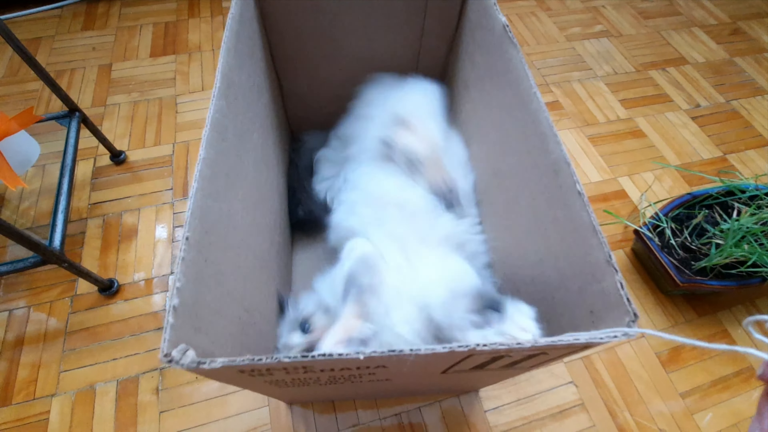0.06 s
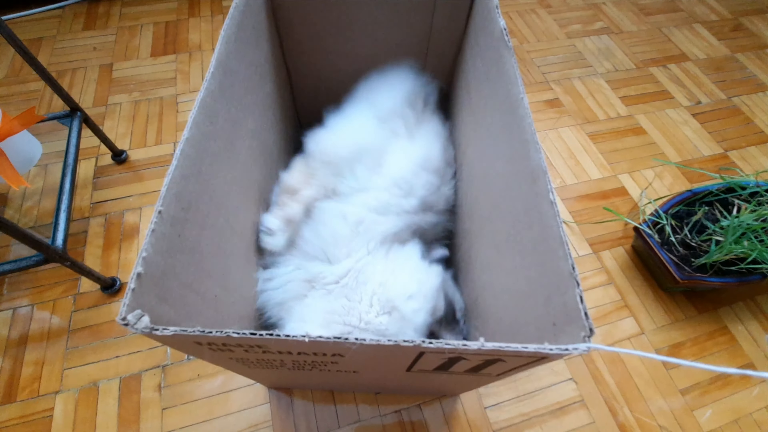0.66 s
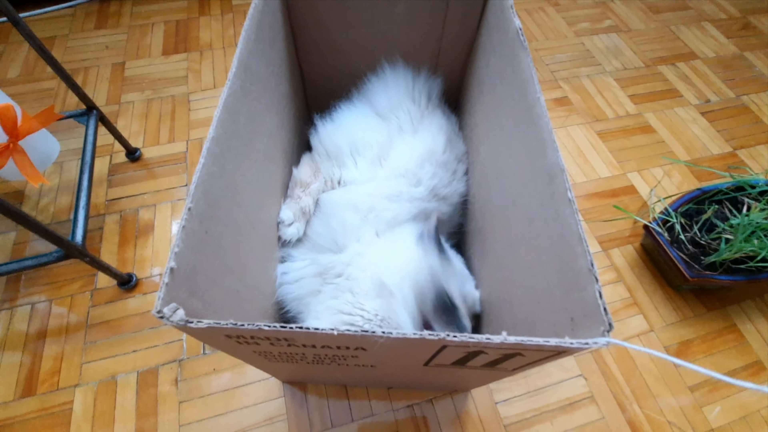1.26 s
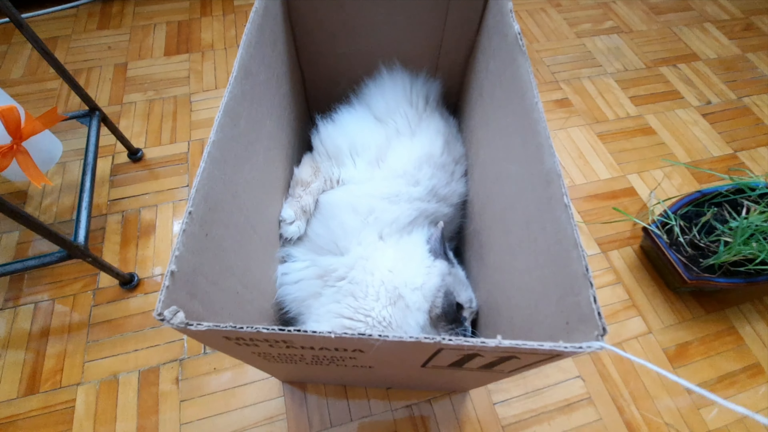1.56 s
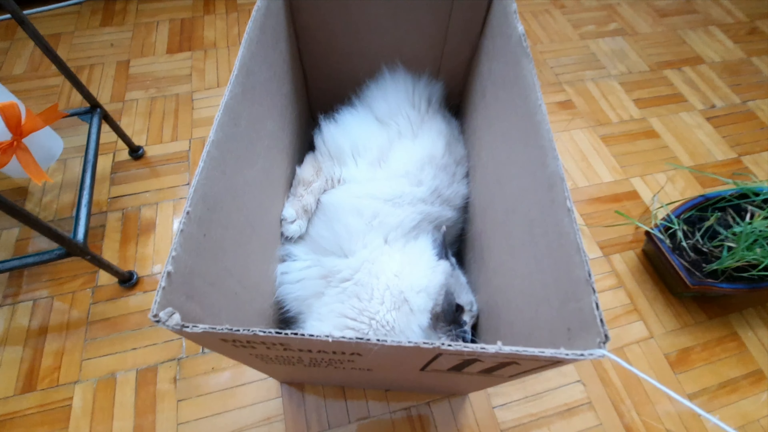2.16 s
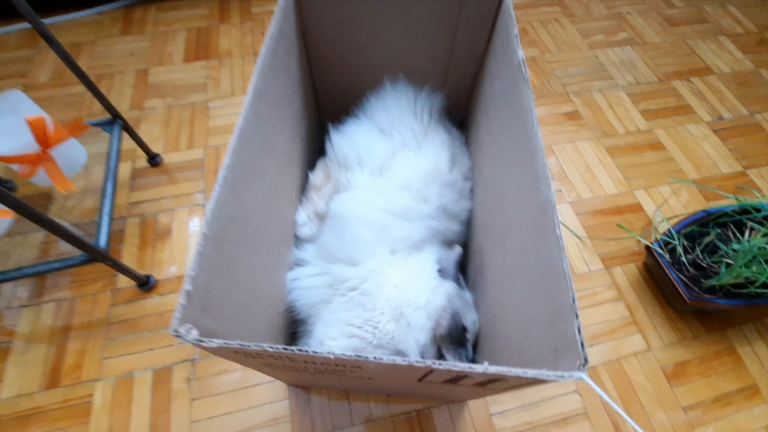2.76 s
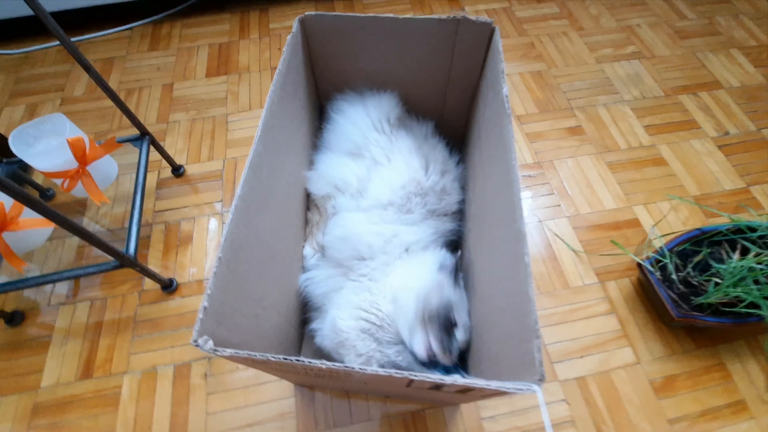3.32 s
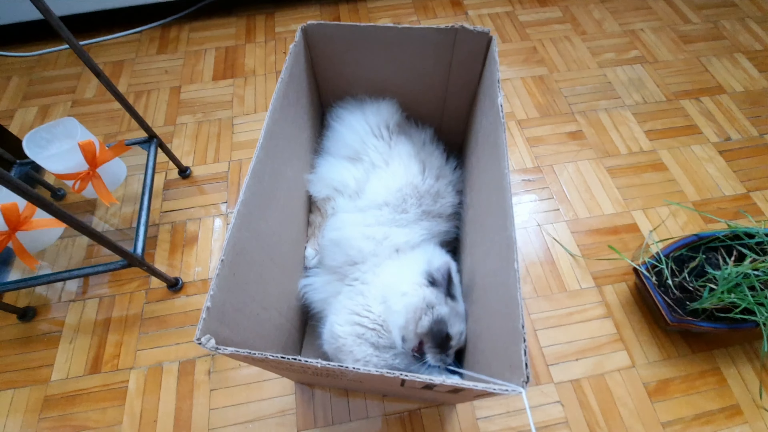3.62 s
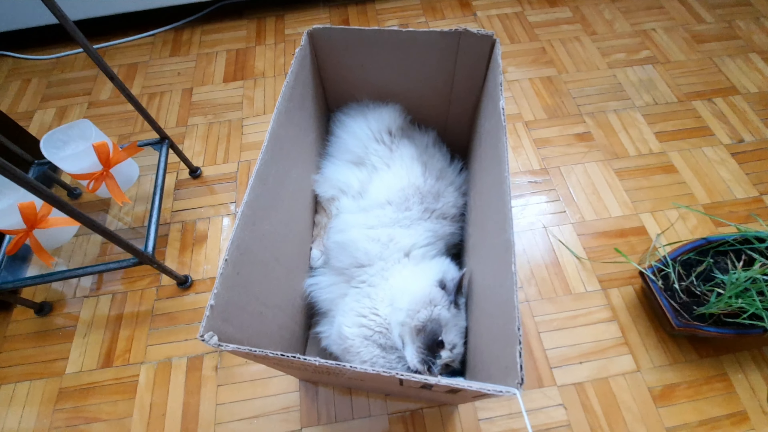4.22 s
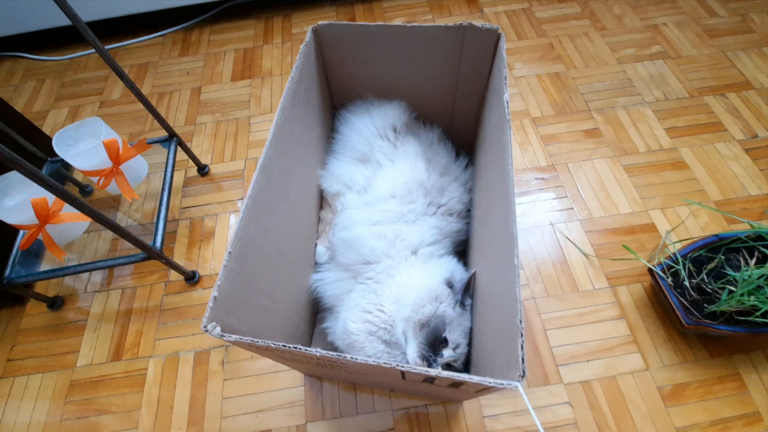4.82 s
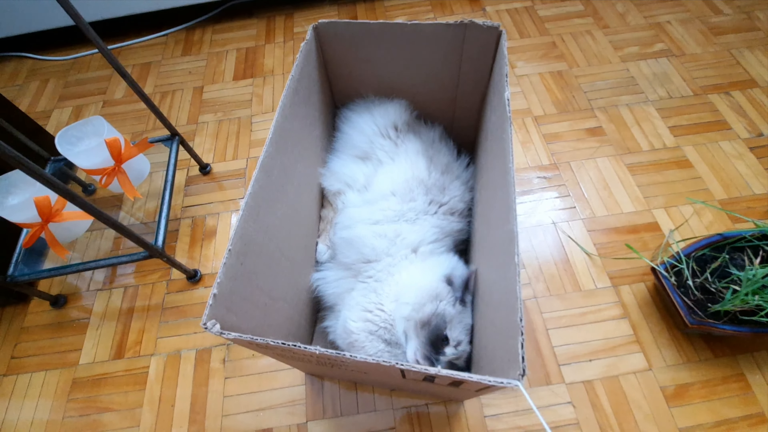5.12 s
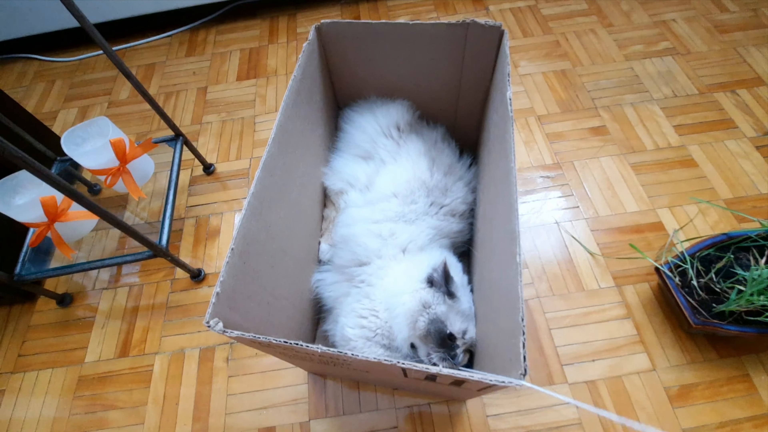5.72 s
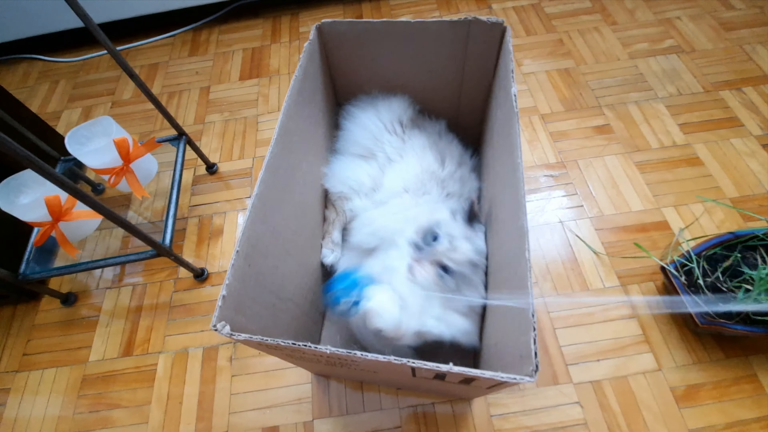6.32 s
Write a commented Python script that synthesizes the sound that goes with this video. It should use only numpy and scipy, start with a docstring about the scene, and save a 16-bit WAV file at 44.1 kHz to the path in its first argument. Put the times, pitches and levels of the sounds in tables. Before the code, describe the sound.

Close by in a quiet, faintly humming room, a cat tumbles in a cardboard box, bumping and scratching the panels and jostling a small bell toy. A lull follows with one brief tap and rattle. Midway, soft string rubbing builds into a scraping swipe with several knocks and thin jingles. Faint taps and rustles continue until a final burst of hollow knocks and rattling.

```python
"""A cardboard box on a wooden floor in a quiet, humming room. A cat rolls over in the box, then lies
still and swats at a toy on a string. Paws and flanks thump the panels, claws snap free, fur and string
stick and slip on the card; all of these set the box ringing. When the toy is jostled, a pellet rattles
in its tiny bell. Table levels are relative, ahead of each layer's gain."""
import sys
import numpy as np
from scipy import signal
from scipy.fft import rfft, irfft, next_fast_len
from scipy.io import wavfile
from scipy.ndimage import uniform_filter1d

SR = 44100
rng = np.random.default_rng(int(sys.argv[2]) if len(sys.argv) > 2 else 0)


def generate_wav(sig):
    """Save sig (samples, or channels by samples) to the path in sys.argv[1] as 16-bit PCM at SR."""
    pcm = np.round(np.clip(np.atleast_2d(sig).T, -1, 1) * 32767).astype(np.int16)
    wavfile.write(sys.argv[1], SR, pcm)


N = 281338
FFT_SIZE = next_fast_len(N + SR)
FREQ_HZ = np.arange(FFT_SIZE // 2 + 1) * SR / FFT_SIZE + 1e-3
TIME_S, EVENT_S = np.arange(N) / SR, np.arange(SR // 4) / SR


def amp(db):
    return 10 ** (np.asarray(db) / 20)


def unit_rms(x):
    return x / np.sqrt(np.mean(x ** 2) + 1e-20)


def curve(points, hz=FREQ_HZ):
    """Table interpolated over log frequency."""
    f, value = np.transpose(points)
    return np.interp(np.log(hz + 1), np.log(f), value)


def add(mix, s, sound):
    part = mix[max(round(s * SR), 0):][:len(sound)]
    part += sound[:len(part)]


def filtered(x, gain):
    return irfft(rfft(x, FFT_SIZE) * gain, FFT_SIZE)[..., :N]


def resonance(hz, width_hz):
    """One damped mode, peak gain 1."""
    return 1 / (1 + 1j * (FREQ_HZ ** 2 - hz ** 2) / (FREQ_HZ * width_hz))


def band_gain(spectrum, lo_hz, hi_hz):
    """Spectrum as a gain that gives white noise rms 1 within the band."""
    gain = amp(curve(spectrum))
    return gain / np.sqrt(np.mean(gain ** 2 * (FREQ_HZ > lo_hz) * (FREQ_HZ < hi_hz)))


def stereo_noise(envelope, gain, coherence_scale=1):
    """Enveloped, filtered noise; the channels agree only at low frequencies."""
    # left-right coherence: f/Hz, coherence
    coherence = [(60, 1), (300, 1), (700, 0.61), (1400, 0.089), (3000, 0.11), (15000, 0)]
    left, other = filtered(envelope * rng.standard_normal((2, N)), gain)
    shared = curve(coherence) * coherence_scale
    right = filtered(left, shared) + filtered(other, np.sqrt(1 - shared ** 2))
    return np.array([left, right])


def room_tone():
    """Diffuse murmur, faint humming resonances and a rumble that comes and goes."""
    # murmur and rumble spectra: f/Hz, density/dB
    murmur_spectrum = [(15, -60), (25, -33), (41, -12.5), (64, -10.5), (175, -7.5), (242, -12.5), (317, -6),
                       (463, -14.5), (659, -15.5), (714, -19.5), (1020, -22), (1840, -25), (5880, -44.5),
                       (7920, -42.5), (16000, -52)]
    rumble_spectrum = [(25, -31), (45, -18), (60, 4), (85, -6.5), (120, -46), (250, -21), (1000, -84)]
    # background levels: t/s, murmur/dB, rumble/dB
    levels = [(0, -54.5, -55), (1.3, -61, -69), (2.1, -62.5, -73), (3.3, -62.5, -62), (4.25, -58.5, -55),
              (4.7, -61, -61.5), (5.7, -55.5, -59.5), (6.38, -55, -64)]
    # room resonances: f/Hz, width per stage/Hz, initial level/dB, drift/(dB/s)
    hums = [(147, 8.3, -76, 0.13), (331.2, 41, -69, 0.63), (2840, 500, -76.5, -0.1),
            (8090, 180, -87.5, 0.05)]
    s, murmur_db, rumble_db = np.transpose(levels)
    murmur = unit_rms(stereo_noise(1, amp(curve(murmur_spectrum)), coherence_scale=0.71))
    rumble = unit_rms(stereo_noise(1, amp(curve(rumble_spectrum))))
    tone = murmur * amp(np.interp(TIME_S, s, murmur_db)) + rumble * amp(np.interp(TIME_S, s, rumble_db))
    for hz, width_hz, db, db_per_s in hums:
        hum = unit_rms(stereo_noise(1, resonance(hz, width_hz) ** 2, coherence_scale=0.72))
        tone += amp(db + db_per_s * TIME_S) * hum
    return tone


def stroke_forces(strokes):
    """Hiss and scrape envelopes; each stroke gathers speed and dies away."""
    roundness = 1.215  # 1 pointed, 2 bell-shaped
    power = np.zeros((2, N))
    for s, rise_s, fall_s, hiss_db, scrape_db in strokes:
        span_s = np.where(TIME_S < s, rise_s, fall_s)
        speed = np.exp(-np.abs((TIME_S - s) / span_s) ** roundness)
        power += np.outer(amp([hiss_db, scrape_db]), speed) ** 2
    return np.sqrt(power)


def stick_slip(rate_hz, spread_db, grain_s, drag):
    """Brief, uneven slips over a steady drag."""
    sizes = amp(spread_db * np.minimum(rng.exponential(1, N), 4))
    slips = sizes * (rng.random(N) < rate_hz / SR)
    power = signal.lfilter([1], [1, -np.exp(-2 / (grain_s * SR))], slips ** 2)
    return unit_rms(np.sqrt(power / power.mean() + drag))


def rub(forces, hiss_spectrum):
    """Fibres hiss over card; under pressure they catch and scrape."""
    # scraped card: f/Hz, density/dB
    scrape_spectrum = [(40, -1), (130, 6), (240, -6), (380, 4), (700, 0.5), (1300, 5), (2200, 3),
                       (3300, -1.5), (6000, -11.5), (15000, -10)]
    hiss_force = forces[0] * stick_slip(rate_hz=900, spread_db=2.5, grain_s=0.0014, drag=2.0)
    scrape_force = forces[1] * stick_slip(rate_hz=700, spread_db=2.5, grain_s=0.0025, drag=0.76)
    hiss = stereo_noise(hiss_force, band_gain(hiss_spectrum, 6000, 12000))
    scrape = stereo_noise(scrape_force, band_gain(scrape_spectrum, 1300, 2600))
    return amp(2) * hiss + amp(0.5) * scrape


def fur():
    """The body rolls and settles while paws drag over the card."""
    # rolling body: t/s, hiss/dB, scrape/dB
    roll = [(0, -69.5, -96), (0.099, -53.5, -52), (.26, -52, -57), (.43, -46.5, -45.5), (.55, -50, -53.5),
            (.68, -54, -55.5), (.79, -62.5, -65), (1.04, -71.5, -65), (1.33, -79.5, -93), (2.1, -86, -80),
            (2.4, -100, -99)]
    # paw drags: peak t/s, rise/s, fall/s, hiss/dB, scrape/dB
    paw_strokes = [(.102, 0.018, 0.02, -68, -48), (.336, 0.036, 0.037, -43, -35),
                   (.373, .003, .004, -34, -55), (.408, 0.0023, 0.011, -40.5, -31),
                   (.880, 0.011, .018, -57, -49), (.903, .018, 0.018, -68, -52),
                   (.962, 0.0057, 0.022, -70, -53), (1.155, 0.019, 0.042, -69, -65),
                   (1.48, 0.039, 0.021, -65, -92), (1.53, 0.041, 0.064, -67, -60.5)]
    # fur on card: f/Hz, density/dB
    hiss_spectrum = [(150, -30), (600, 9), (1500, -17.5), (3300, 3.5), (5500, 2.5), (8000, 3), (12000, 4.5),
                     (15500, -4.5)]
    s, *levels_db = np.transpose(roll)
    body = amp([np.interp(TIME_S, s, db, right=-120) for db in levels_db])
    return rub(np.hypot(body, stroke_forces(paw_strokes)), hiss_spectrum)


def card_flex(db, hz, swell_s):
    """Struck card swings briefly; the envelope peaks at swell_s."""
    envelope = EVENT_S / swell_s * np.exp(1 - EVENT_S / swell_s)
    return amp(db - 2.5) * envelope * np.sin(2 * np.pi * hz * EVENT_S)


def card_crack(hits):
    """Bright noise burst for each quick blow, given as (t/s, amplitude)."""
    # cracking card: f/Hz, density/dB
    spectrum = [(300, -43), (1200, -0.5), (2500, 3.5), (5000, -10), (10000, -10), (16000, -12)]
    decay = np.exp(-EVENT_S / 0.0098) + 0.54 * np.exp(-EVENT_S / 0.032)
    force = np.zeros(N)
    for s, gain in hits:
        add(force, s, gain * decay)
    return amp(-1.5) * stereo_noise(force, unit_rms(amp(curve(spectrum))))


def knocks():
    """Paws and head flex, slap and crunch a panel; only quick blows crack brightly."""
    # blows: t/s, knock/dB, panel f/Hz, swell/s, slap/dB, crunch/dB
    blows = [(.096, -21.5, 337, 0.0043, -34, -33.5), (.141, -25, 366, 0.0016, -41, -36),
             (.238, -12.5, 760, .00048, -33, -25), (.410, -14.5, 338, 0.004, -28, -28),
             (0.422, -25.5, 525, 0.0046, -55, -42), (.501, -16.5, 355, 0.0009, -40, -32.5),
             (.537, -34, 496, 0.0026, -44, -24), (0.555, -28.5, 325, 0.0057, -60, -42),
             (.667, -22, 317.6, 0.0063, -43, -43), (.754, -39, 306, 0.0071, -62, -52),
             (.852, -44.5, 503, 0.0038, -68, -37), (.971, -41, 332, 0.0027, -62, -51),
             (.983, -39, 358, 0.0023, -65, -50), (1.4819, -33.5, 340, 0.0042, -27.5, -33),
             (1.503, -34, 323, 0.0044, -64, -45), (3.554, -34, 372, 0.0052, -67, -50),
             (3.568, -29, 404, 0.007, -50, -26.5), (3.572, -30, 503, 0.0029, -54, -56),
             (3.679, -27, 379, .0024, -51, -33), (3.706, -31.5, 390, 0.0037, -57, -39.5),
             (4.411, -36.5, 349, 0.0038, -53.5, -48.5), (4.429, -45, 385, .006, -62, -50.5),
             (5.476, -44, 416, 0.0039, -70, -49), (6.104, -46, 367, 0.0077, -67, -47.5),
             (6.271, -40, 430, .0023, -56, -50), (6.344, -18.5, 350, 0.0014, -25, -48),
             (6.349, -24.5, 620, .0047, -60, -48), (6.361, -20.5, 320, 0.004, -54, -38)]
    # card ringing around the paw: delay/s, f/Hz, swell/s, level/dB
    slap_modes = [(0, 890, 0.0015, -2.5), (.001, 1036, 0.0026, -14.5), (.005, 594, 0.004, -12)]
    # dull papery crunch: f/Hz, density/dB
    crunch_spectrum = [(60, -6.5), (230, -1), (600, 5.5), (1100, -7.5), (2000, -24), (4000, -29),
                       (10000, -26), (16000, -57)]
    give_lag_s = 0.00097  # the panel yields just after contact
    crumple = np.exp(-EVENT_S / 0.0055) + 0.23 * np.exp(-EVENT_S / 0.049)
    flex, crunch_force = np.zeros((2, N))
    cracks = []
    for s, knock_db, hz, swell_s, slap_db, crunch_db in blows:
        add(flex, s + give_lag_s, card_flex(knock_db, hz, swell_s))
        for delay_s, ring_hz, ring_swell_s, ring_db in slap_modes:
            add(flex, s + delay_s, card_flex(slap_db + ring_db, ring_hz, ring_swell_s))
        add(crunch_force, s, amp(crunch_db) * crumple)
        hardness = 1 / (1 + (swell_s / 0.00043) ** 2)
        cracks.append((s, amp(crunch_db) * hardness))
    crunch = stereo_noise(crunch_force, unit_rms(amp(curve(crunch_spectrum))))
    return flex + amp(-3) * crunch + card_crack(cracks)


def thuds():
    """The cat's weight bends a wall; the box bottom follows with a boom."""
    # landings: t/s, wall/dB, wall f/Hz, swell/s, bottom/dB
    landings = [(.106, -26.5, 127.4, .010, -30), (.149, -24, 129, 0.0074, -26),
                (.248, -44, 131, 0.012, -35.5), (0.432, -34, 89, 0.0078, -33),
                (0.508, -11.5, 163, .0024, -21.5), (.573, -28.5, 154, 0.0083, -49),
                (0.675, -23.5, 110, 0.0043, -30), (1.524, -40, 142, 0.0039, -51),
                (1.558, -42, 100, 0.003, -66), (3.576, -36.5, 132, 0.017, -58),
                (4.42, -50.5, 128, 0.013, -63), (5.253, -48, 84.5, 0.0092, -74),
                (6.356, -31, 103, .0078, -55)]
    bottom_lag_s = 0.014
    flex = np.zeros(N)
    for s, wall_db, hz, swell_s, bottom_db in landings:
        add(flex, s, card_flex(wall_db, hz, swell_s))
        add(flex, s + bottom_lag_s, card_flex(bottom_db, hz=59.5, swell_s=0.011))
    return flex


def claws():
    """A claw catches in the card and snaps free."""
    # snaps: t/s, level/dB, f/Hz
    snaps = [(0.373, -20, 4700), (0.4058, -21, 5600), (0.668, -37, 5500), (0.959, -33.5, 3370)]
    flex = np.zeros(N)
    for s, db, hz in snaps:
        add(flex, s, card_flex(db, hz, swell_s=0.00018))
    return flex + card_crack([(s, amp(db - 17.5)) for s, db, _ in snaps])


def shell_ring(hz, t60_s, smear_hz):
    """Decaying bell modes; the rolling pellet disturbs the phase and widens each line."""
    steps = rng.standard_normal((len(hz), len(EVENT_S)))
    drift_rad = np.cumsum(steps, 1) * np.sqrt(2 * np.pi * smear_hz / SR)
    phase_rad = 2 * np.pi * (hz * EVENT_S + rng.random(hz.shape)) + drift_rad
    return amp(-60 * EVENT_S / t60_s) * np.sin(phase_rad)


def toy_bell(ping_hz):
    """The pellet strikes and chatters in the shell; a thin ping rings on."""
    # jostles: t/s, rattle/dB, tilt/(dB/octave), most excited f/Hz, ping/dB
    jostles = [(.442, -29, -11, 4300, -46), (0.525, -23.5, -8, 4900, -53), (0.55, -26.5, -18, 5250, -53),
               (.614, -34, 6, 5300, -57), (0.878, -41, -6, 5300, -55), (1.009, -44.5, 2, 7000, -53),
               (1.026, -37, 1, 5300, -49.5), (1.091, -47, -8, 5300, -68), (1.116, -52, -3, 5300, -52),
               (1.482, -38, 9, 5300, -63), (1.5156, -39, -4, 5300, -66), (2.559, -45, 1, 4450, -58),
               (3.5895, -32, -7, 4300, -44), (3.65, -40, -8, 4300, -48), (3.6855, -29, 9, 4300, -44),
               (3.715, -32.5, -3, 4500, -49), (3.743, -39, 1, 4700, -55), (3.762, -37.5, -1, 4300, -53),
               (3.832, -47.5, -4, 4410, -69), (5.355, -52.5, -3, 4300, -85), (5.379, -50, -5, 4300, -76),
               (5.466, -49.5, 3, 4300, -67), (6.287, -36, 11, 4400, -60), (6.345, -58, -2, 4400, -38.5),
               (6.355, -36.5, 5, 4400, -54)]
    # shell modes: f/Hz, level/dB, T60/s
    shell_modes = [(4290, -1, 0.13), (4296, -2, 0.063), (4760, -7, 0.081), (4630, 6, 0.069),
                   (5360, -0.5, 0.056), (5270, -3.5, 0.15), (6000, -6, 0.092), (6440, 1, 0.048),
                   (7300, -9, 0.061), (7620, -6.5, 0.09), (8320, -3, 0.077), (8240, -18, .06),
                   (10300, -17, .06), (9580, -1, 0.031), (10720, -20, 0.044)]
    hz, db, t60_s = np.transpose(shell_modes)[:, :, None]
    t, n, bounce_rate_hz = EVENT_S, len(EVENT_S), 250
    bell = np.zeros((2, N))
    for s, rattle_db, tilt_db, struck_hz, ping_db in jostles:
        favoured_db = 6 * np.exp(-((hz - struck_hz) / 300) ** 2)  # modes moving most at the impact
        mode_db = db + favoured_db + tilt_db * np.log2(hz / hz[0])
        for channel in bell:
            weights = amp(mode_db + 2 * rng.standard_normal(hz.shape))
            modes = weights * shell_ring(hz, t60_s, smear_hz=22)
            tick = 0.91 * np.exp(-t / 0.0024) * rng.standard_normal(n)
            strike = modes.sum(0) / np.linalg.norm(weights) + tick
            bounces = rng.standard_normal(n) * (rng.random(n) < bounce_rate_hz / SR)
            bounces *= 0.13 * np.exp(-t / 0.053)
            ping = shell_ring(np.array([[ping_hz]]), t60_s=0.25, smear_hz=5)[0]
            ping *= 1 - np.exp(-t / 0.0036)
            hit = amp(rattle_db - 4.5) * strike + amp(ping_db) * ping
            add(channel, s, hit + signal.fftconvolve(hit, bounces)[:n])
    return bell


def pellet_shimmer(ping_hz):
    """Tiny taps of the rolling pellet feed the shell's highest mode."""
    # pellet rolls: peak t/s, half length/s, level/dB
    rolls = [(.46, .025, -55), (.72, 0.22, -63), (3.72, .11, -61)]
    speed = sum(amp(db) * np.exp(-((TIME_S - s) / half_s) ** 2) for s, half_s, db in rolls)
    return speed * unit_rms(stereo_noise(1, resonance(ping_hz, width_hz=45) ** 2))


def string_and_swipe():
    """The string slides over the rim, and a paw swipes across the card."""
    # string slides, paw swipe near 3.6 s: peak t/s, rise/s, fall/s, hiss/dB, scrape/dB
    strokes = [(2.51, 0.031, 0.036, -62.5, -72), (2.564, 0.033, 0.047, -60, -60.5),
               (2.72, 0.043, 0.047, -72.5, -65.5), (2.915, .025, 0.016, -69, -70),
               (3.2, .24, 0.087, -59.5, -66), (3.218, 0.022, 0.033, -58.5, -56.5),
               (3.31, 0.068, 0.054, -55.5, -55), (3.463, 0.011, 0.018, -55.5, -55),
               (3.578, 0.011, 0.029, -66, -39.5), (3.618, 0.024, 0.026, -59, -40.5),
               (3.69, 0.17, 0.066, -57, -51.5), (3.85, 0.079, 0.063, -60, -60.5),
               (4.09, 0.076, 0.059, -67, -73), (4.30, 0.029, 0.038, -68, -73), (5.0, 0.4, .4, -95, -72),
               (5.39, 0.067, 0.11, -69.5, -60.5), (5.48, 0.033, 0.062, -65, -68),
               (6.13, 0.12, 0.24, -66, -67.5), (6.284, .007, 0.02, -46.5, -48.5),
               (6.35, 0.033, 0.017, -55.5, -55.5)]
    # sliding hiss: f/Hz, density/dB
    hiss_spectrum = [(70, -2), (140, 3.5), (230, 9), (360, 12.5), (700, 8.5), (1200, 4.5), (2000, -7.5),
                     (3800, -1.5), (5500, -1.5), (8000, 0), (12000, -2), (15500, -9.5)]
    return rub(stroke_forces(strokes), hiss_spectrum)


def moving_contact(x, spread_db):
    """The contact point travels over the card, shifting the colour in short patches."""
    spectra = signal.stft(x, SR, nperseg=256)[2]
    patches = uniform_filter1d(rng.standard_normal(spectra.shape[1:]), size=3, axis=0)
    patches = uniform_filter1d(patches, size=8, axis=1)
    gain = unit_rms(amp(spread_db * unit_rms(patches)))
    return signal.istft(spectra * gain, SR)[1][:, :N]


def box(x):
    """The panels radiate directly and set the open box ringing."""
    # box and air modes: f/Hz, width/Hz, level/dB
    modes = [(54.3, 6.3, 0.5), (91, 12, 3), (130, 14, 1), (317, 18, 0.5), (385.5, 14.4, 2), (514, 41, 0),
             (641, 17, -8.5), (667.5, 63, 1.5), (1012, 44, -1), (1238, 38, -8.5), (1442, 33, -7),
             (1683, 23, -3), (2033, 21, -3.5), (2180, 31, -29)]
    return filtered(x, 1 + sum(amp(db) * resonance(hz, width_hz) for hz, width_hz, db in modes))


def reflections(x):
    """Sparse echoes from floor and walls; the treble dies first."""
    # room decay: f/Hz, T60/s
    decay = [(80, 0.29), (400, 0.48), (2000, 0.16), (8000, 0.12), (16000, 0.22)]
    slot = 22  # samples per echo
    starts = np.arange(10 * slot, SR // 2, slot)
    arrivals = starts + rng.integers(0, slot, (2, len(starts)))
    taps = np.zeros((2, SR // 2 + slot))
    np.put_along_axis(taps, arrivals, rng.choice([-1., 1.], arrivals.shape), 1)
    hz, t, spectra = signal.stft(taps, SR, nperseg=256)
    tail = signal.istft(spectra * amp(-60 * t / curve(decay, hz)[:, None]), SR)[1]
    return signal.fftconvolve(x, tail / np.linalg.norm(tail[0]), axes=1)[:, :N]


def scene():
    """Rubbing and blows sound through the box, the toy beside it, all in a small room."""
    ping_hz = 12948
    rubbing = moving_contact(fur() + string_and_swipe(), spread_db=2.5)
    card = box(rubbing + knocks() + thuds() + claws())
    direct = card + toy_bell(ping_hz) + pellet_shimmer(ping_hz)
    return direct + amp(-11) * reflections(direct) + room_tone()


def record(dry):
    """Slightly stronger left microphone, then a steep low-pass."""
    # channel imbalance: f/Hz, left over right/dB
    left_lead = [(60, 3), (125, 4.8), (250, 2.4), (500, 1.6), (1000, 2.1), (2000, 1.5), (4000, 1),
                 (8000, 3.2), (13000, 3.6)]
    cutoff_hz = 15850
    tilted = filtered(dry, amp(np.outer([.5, -.5], curve(left_lead))))
    low_pass = signal.firwin(511, cutoff_hz, window=("kaiser", 9), fs=SR)
    return signal.oaconvolve(tilted, low_pass[None], "same")


dry = scene()
out = record(dry)
generate_wav(out)
```